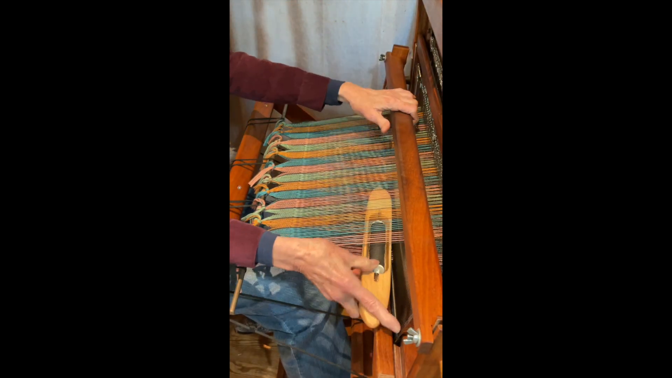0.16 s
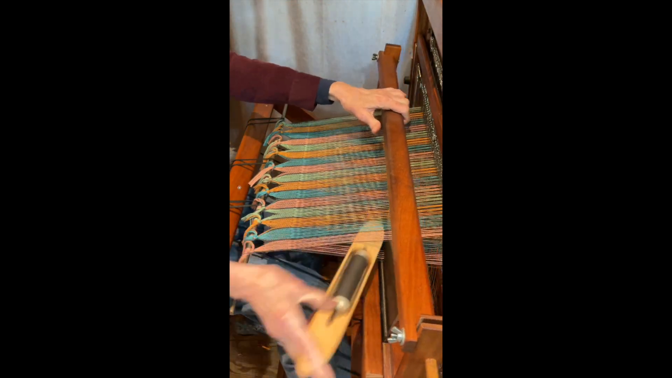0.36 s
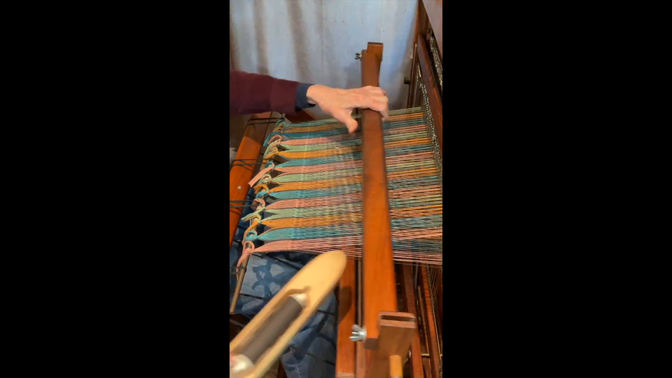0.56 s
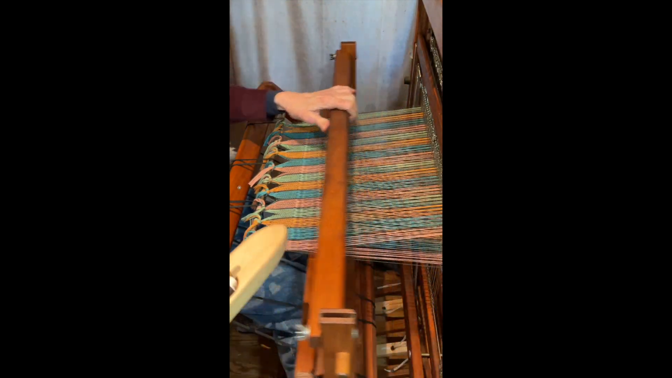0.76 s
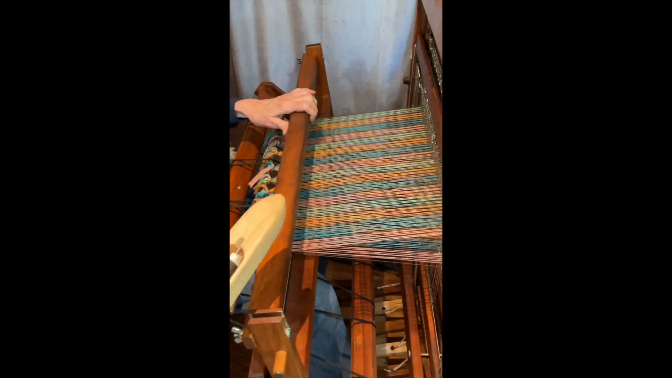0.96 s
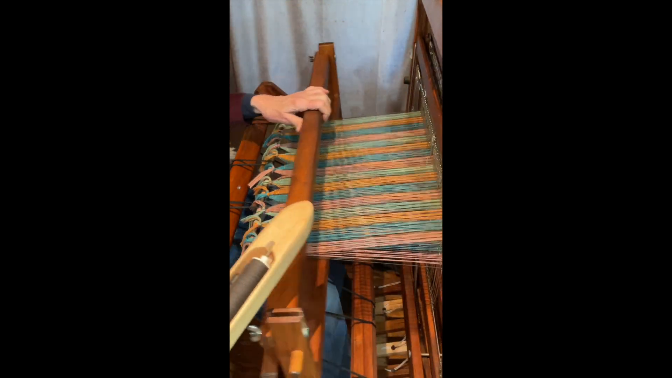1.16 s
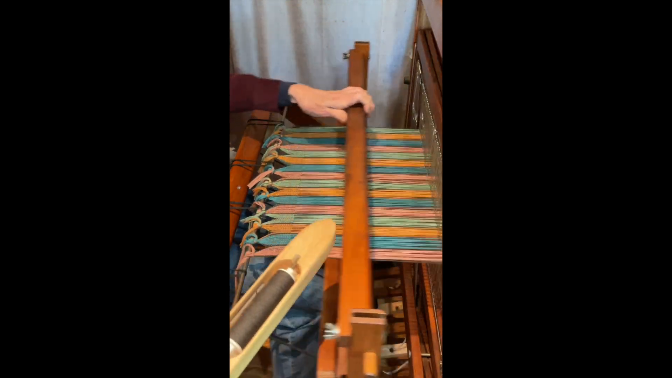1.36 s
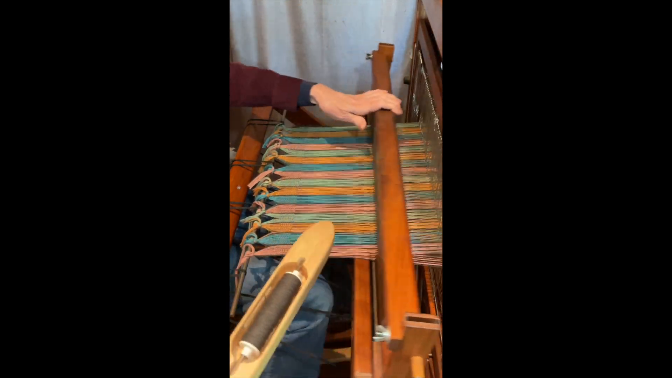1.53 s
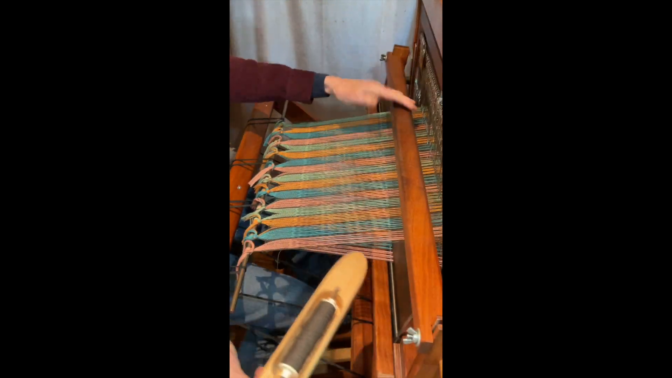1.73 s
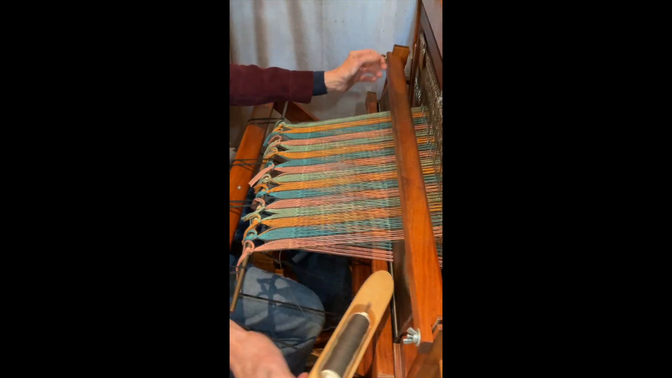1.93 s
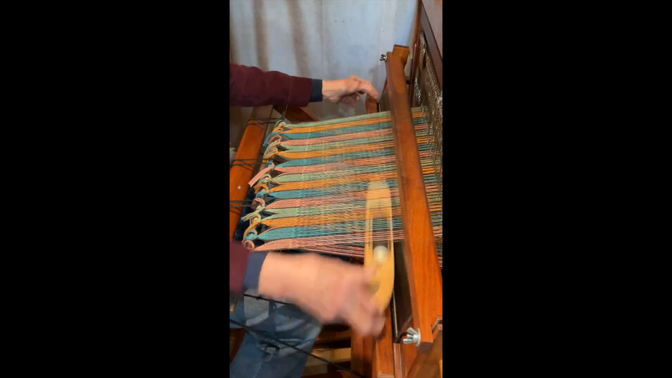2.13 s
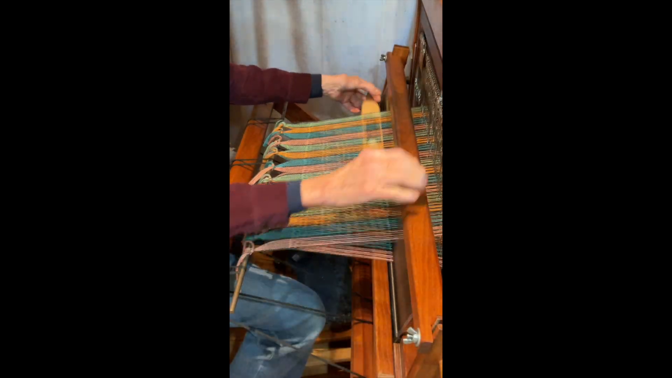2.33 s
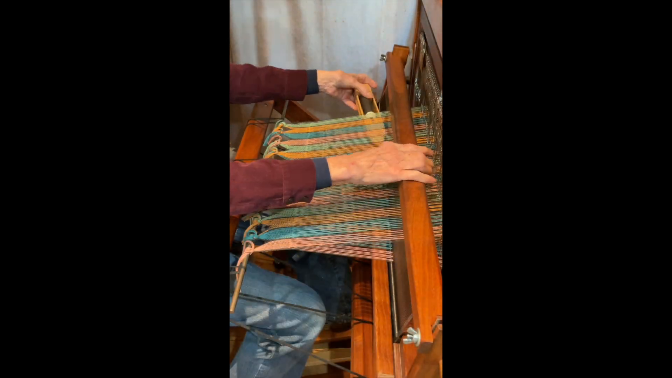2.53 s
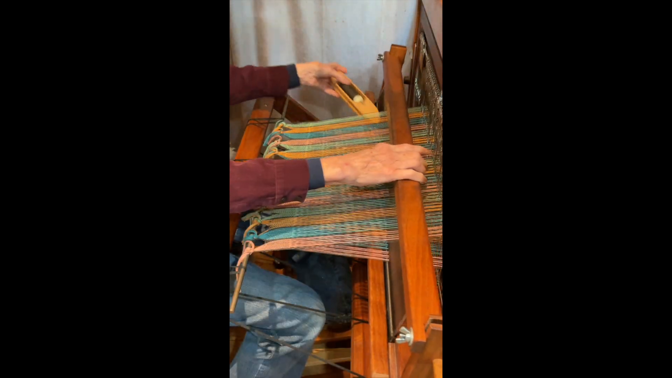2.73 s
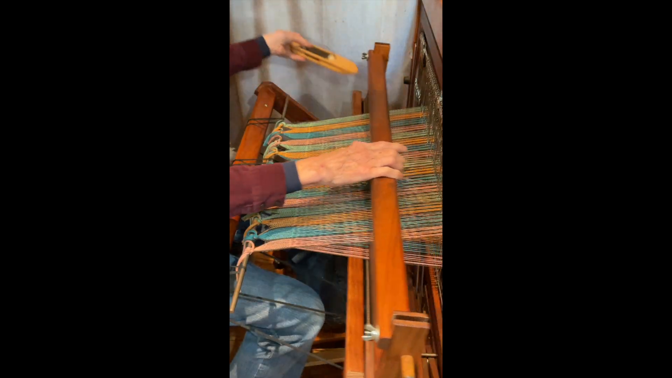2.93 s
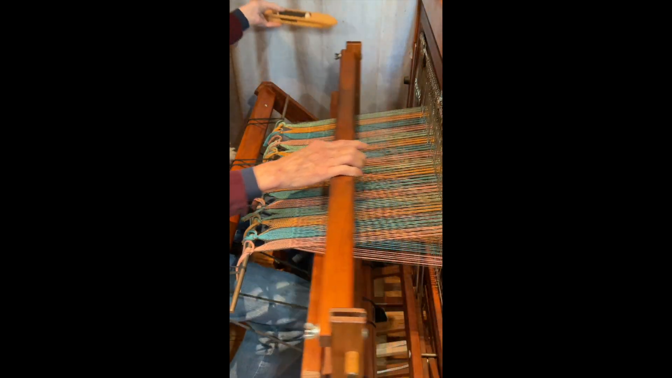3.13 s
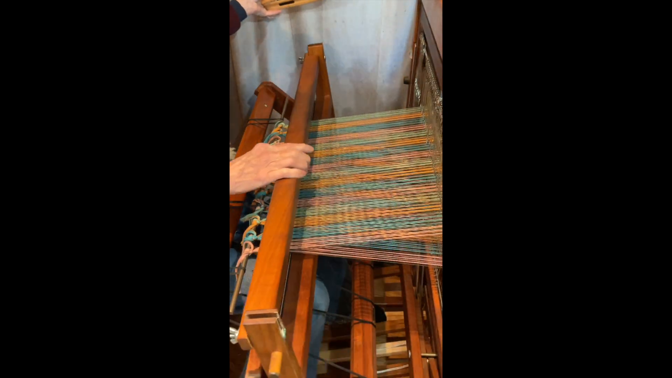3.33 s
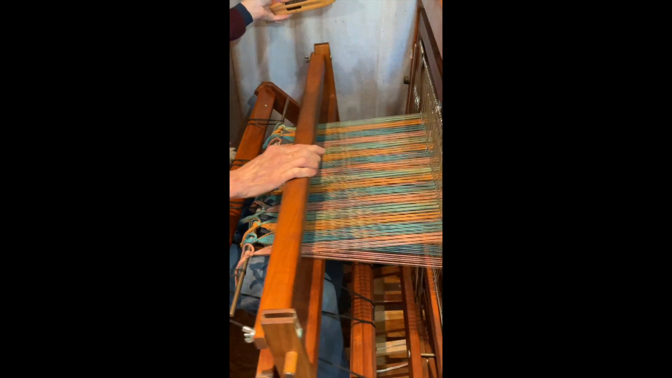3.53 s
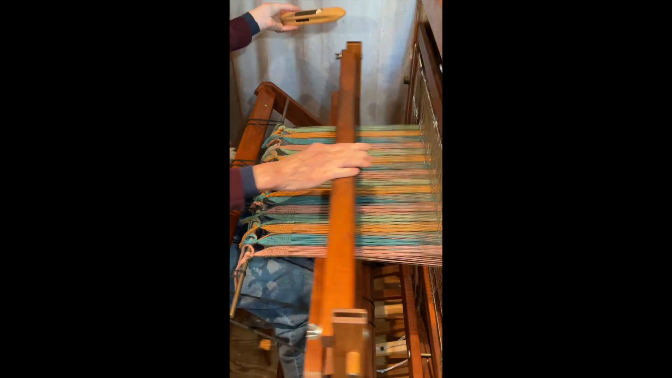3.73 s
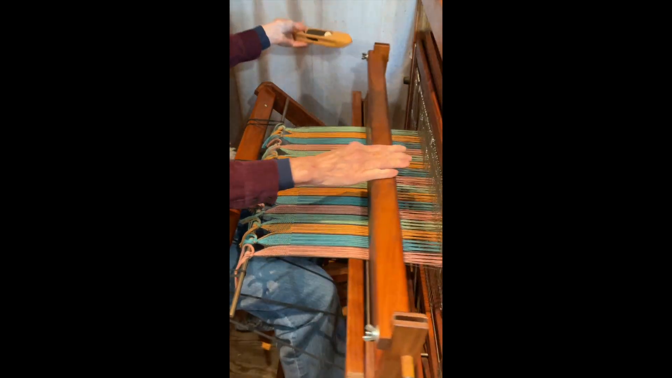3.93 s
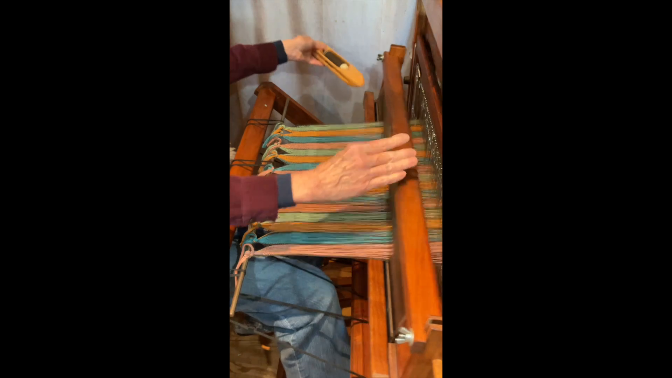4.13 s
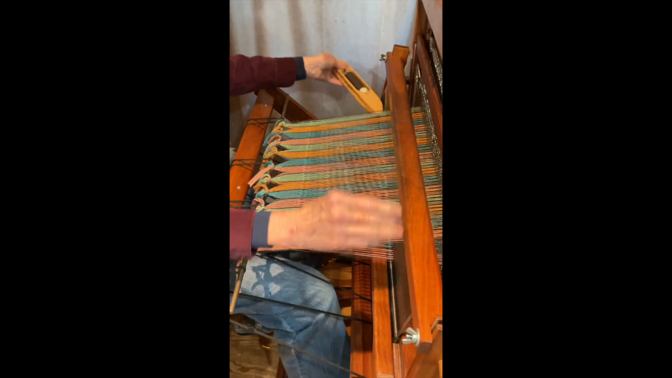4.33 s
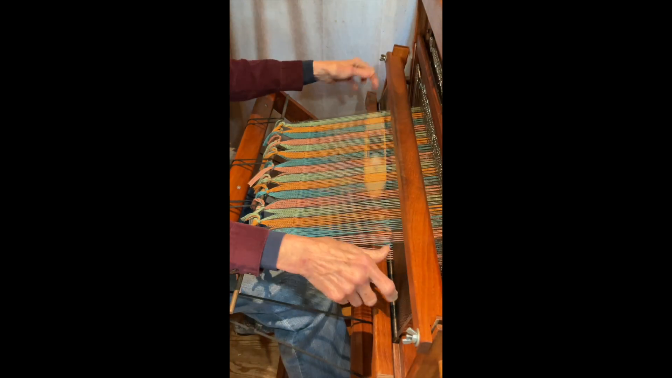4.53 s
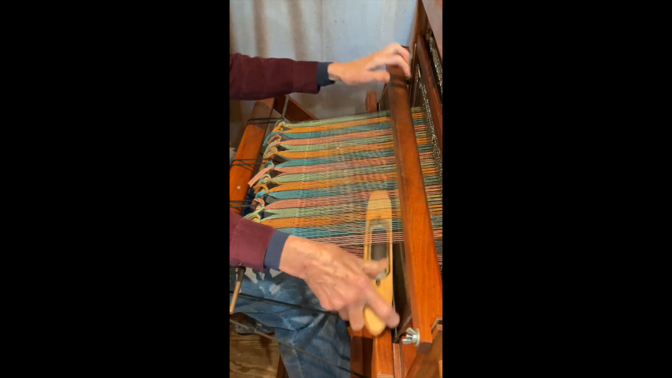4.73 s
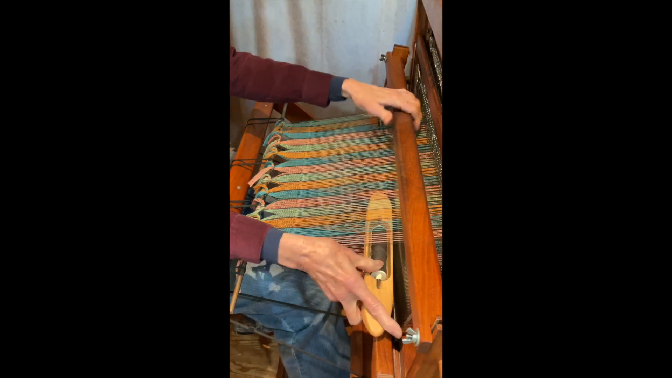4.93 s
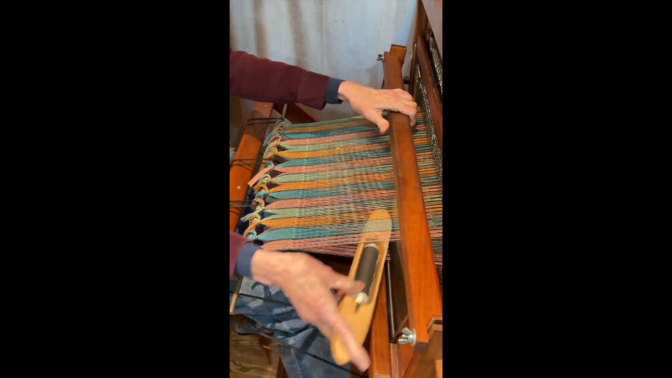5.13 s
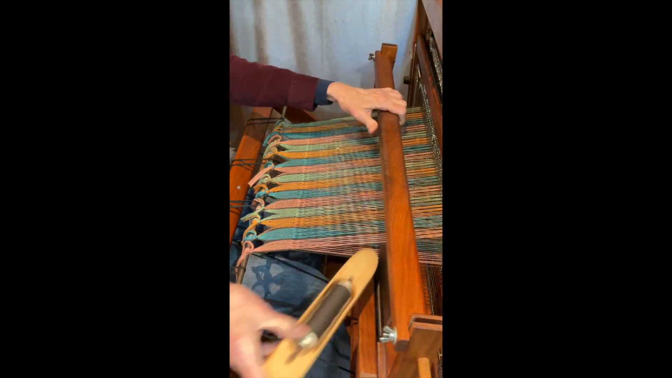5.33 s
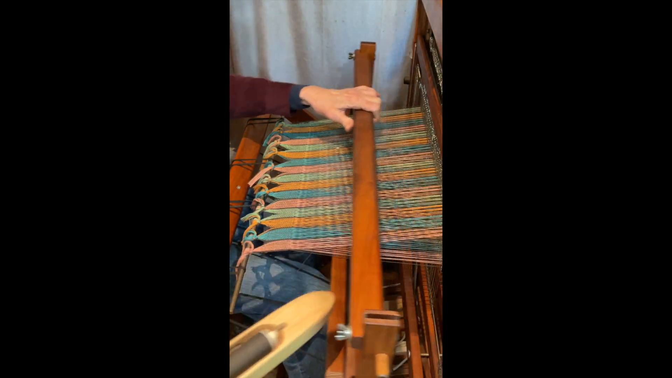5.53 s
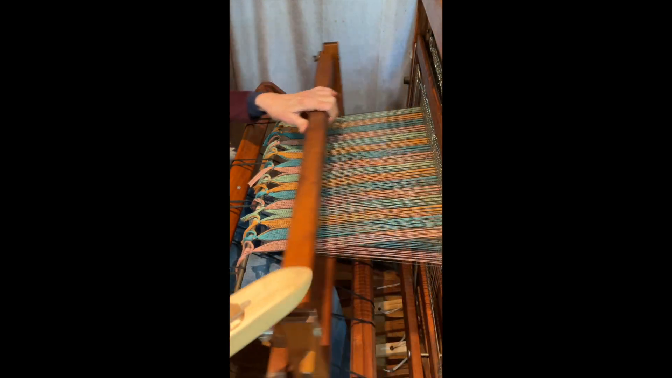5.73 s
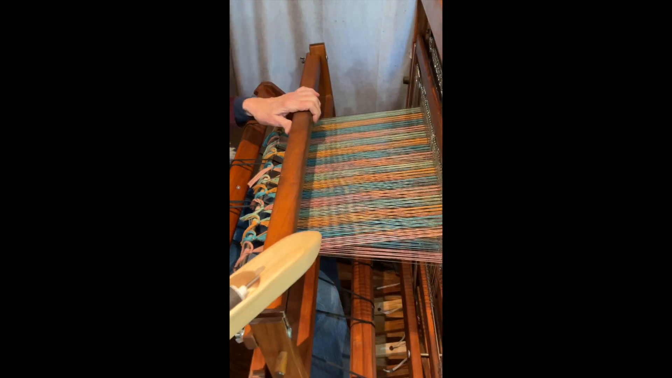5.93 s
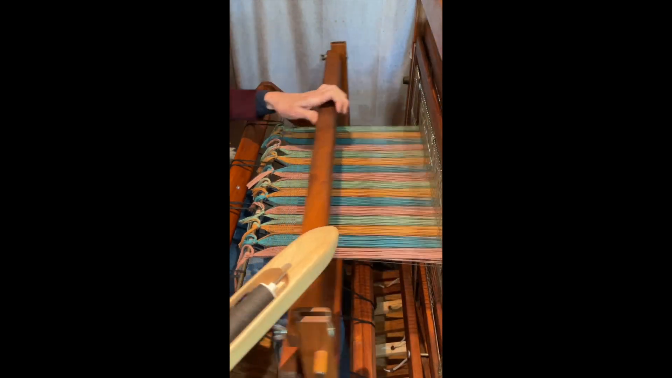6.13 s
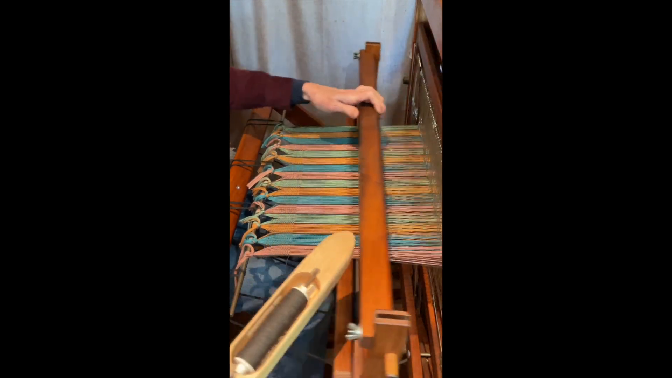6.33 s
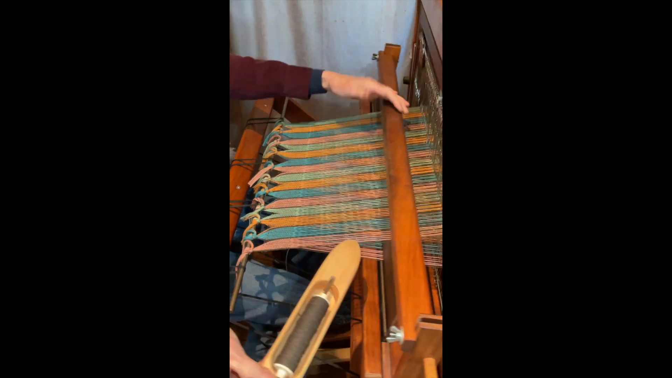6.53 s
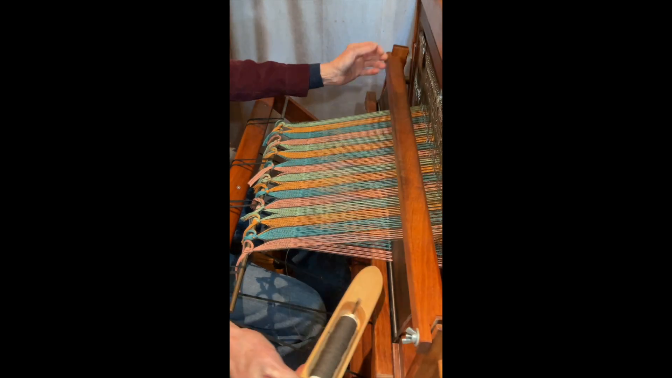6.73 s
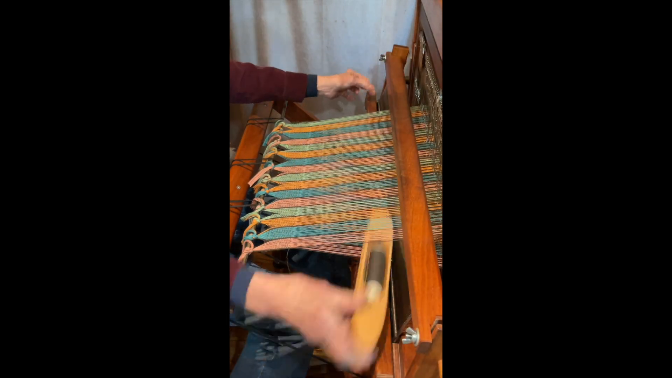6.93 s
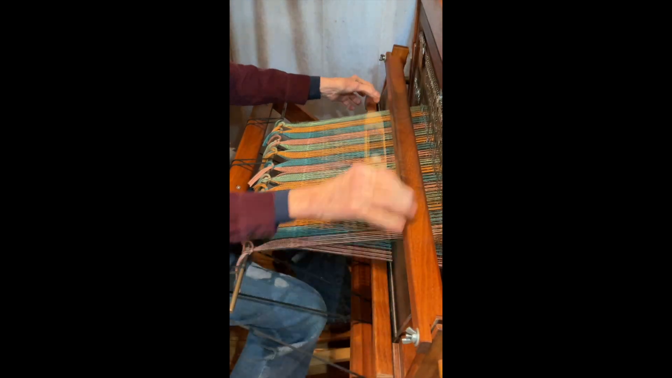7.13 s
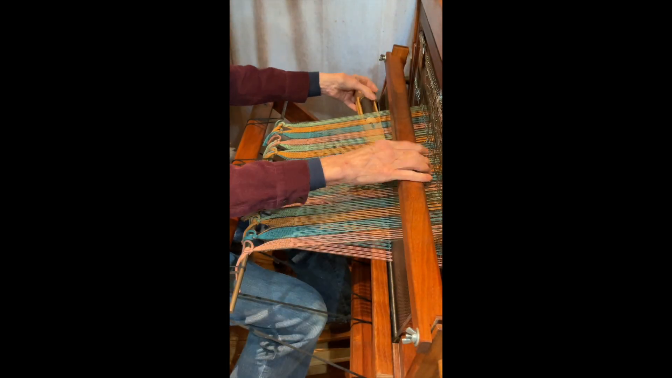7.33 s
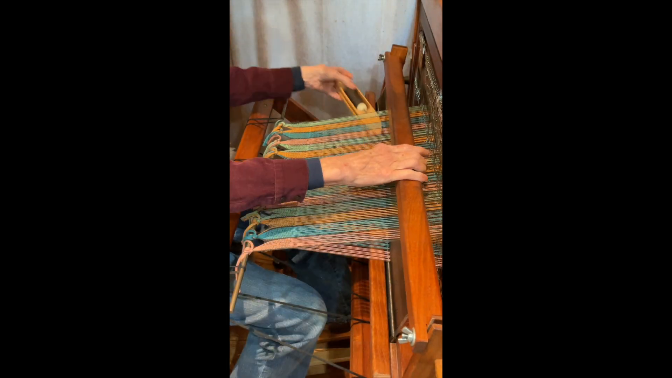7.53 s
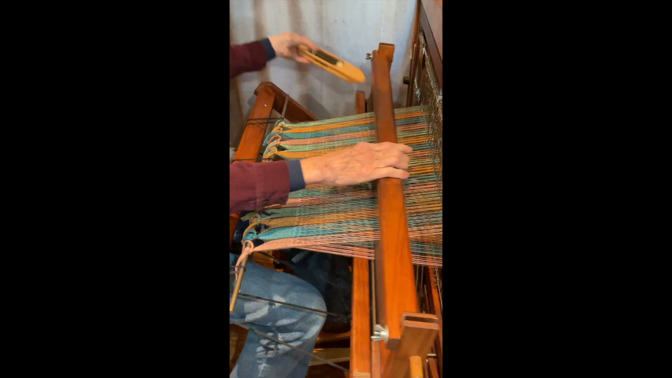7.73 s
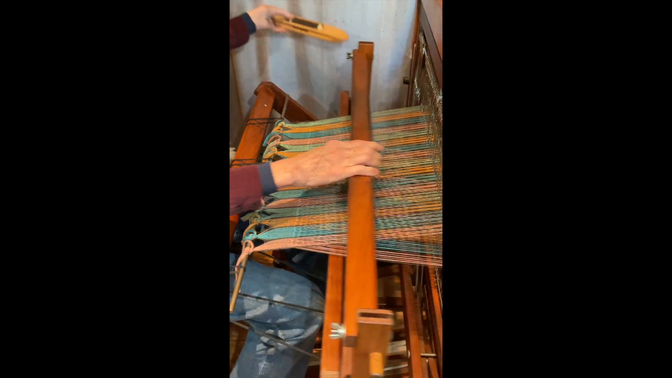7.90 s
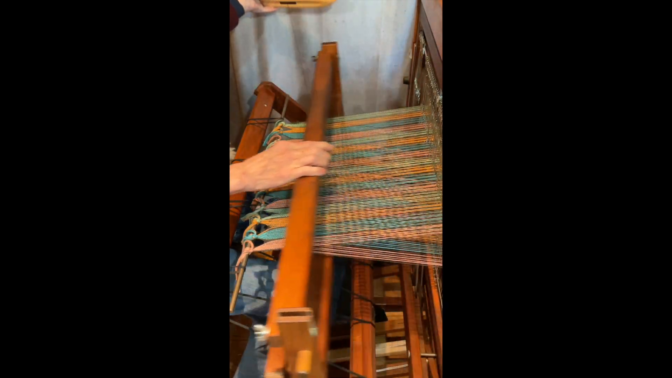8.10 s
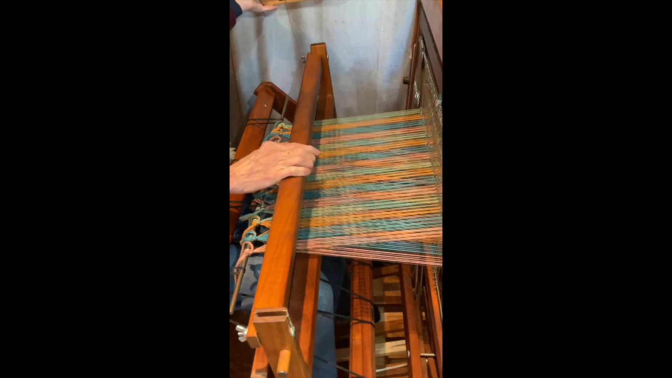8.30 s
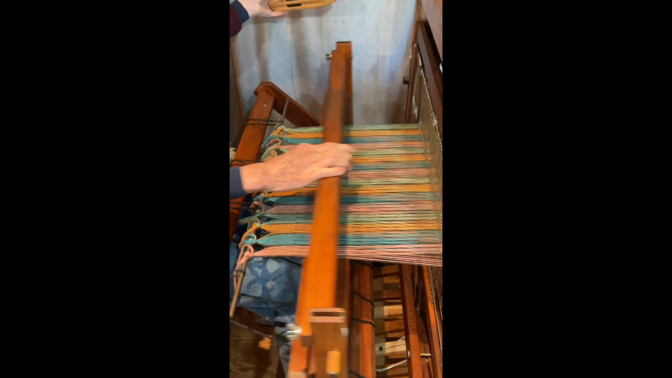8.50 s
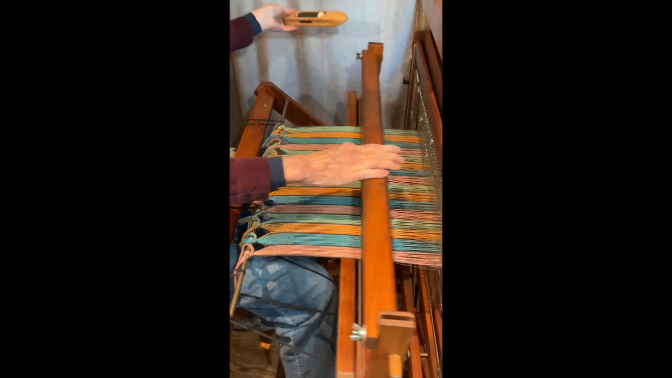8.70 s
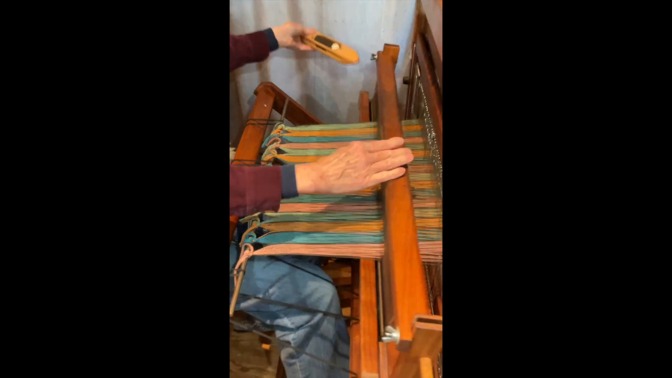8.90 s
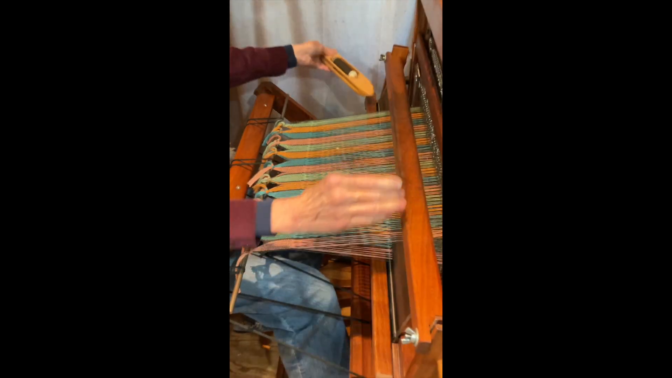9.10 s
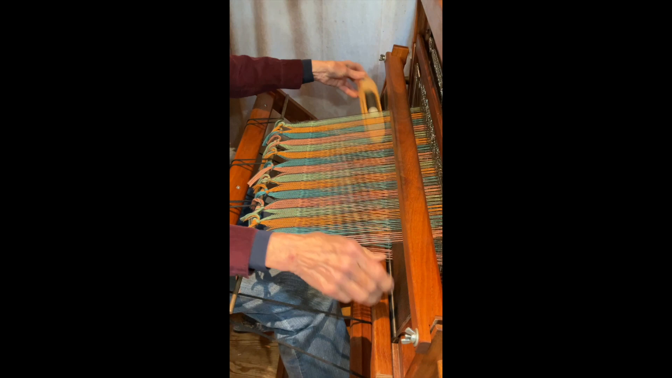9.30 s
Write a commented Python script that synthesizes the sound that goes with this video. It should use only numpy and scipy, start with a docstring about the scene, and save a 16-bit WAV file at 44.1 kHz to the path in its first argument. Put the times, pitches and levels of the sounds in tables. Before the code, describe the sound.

Hand weaving heard close up: a bobbin whirrs and taps, wood knocks, wire heddles jingle, and a shuttle clatters across, four times over.

```python
"""A bobbin whirrs and taps as thread is drawn off it, then a wooden floor loom knocks in a small room.
Four times the weaver presses the thread in with the beater and changes the foot pedals: wood knocks,
the frame rumbles, and the heddles (metal wires that lift the threads) jingle on their bars.
After each round the shuttle glides across the stretched threads, its bobbin spinning and clattering.
The last throw ends with a dry snap of the shuttle's tip."""
import sys
import numpy as np
from scipy import signal
from scipy.fft import rfft, irfft, next_fast_len
from scipy.io import wavfile
from scipy.ndimage import uniform_filter1d

SR = 44100
rng = np.random.default_rng(int(sys.argv[2]) if len(sys.argv) > 2 else 0)


def bounce(signal):
    """Save signal as a 16-bit WAV file at the path given by the first command-line argument."""
    frames = np.transpose(np.atleast_2d(signal))
    limited = np.clip(frames, -1, 1)
    pcm = np.round(limited * 32767).astype(np.int16)
    wavfile.write(sys.argv[1], SR, pcm)


N = 417186
TIME = np.arange(N) / SR
RING_TIME = TIME[:SR // 6]   # time axis for one short sound


def from_db(db):
    """Turn decibels into a gain."""
    return 10 ** (np.asarray(db) / 20)


def rms_one(x):
    """Scale a sound so that its average level (rms) is 1."""
    return x / np.sqrt(np.mean(x ** 2) + 1e-20)


def peak_one(x):
    """Scale a sound so that its loudest two milliseconds have rms 1."""
    return x / np.sqrt(uniform_filter1d(x ** 2, size=SR // 500).max() + 1e-20)


def at_hz(points, hz):
    """Read between the rows of a table, on a log-frequency axis."""
    table = np.array(points)
    return np.interp(np.log(np.maximum(hz, 1)), np.log(table[:, 0]), table[:, 1])


def colour(x, spectrum):
    """Make each frequency as strong as a table says; the result has rms 1."""
    size = next_fast_len(len(x))
    hz = np.arange(size // 2 + 1) * SR / size
    return rms_one(irfft(rfft(x, size) * from_db(at_hz(spectrum, hz)), size)[:len(x)])


def passband(x, hz, kind, order=2):
    """Let the "low" part, the "high" part or one "band" of a sound through."""
    return signal.sosfilt(signal.butter(order, hz, kind, fs=SR, output="sos"), x)


def resonate(x, modes, uneven=False):
    """Ring an object's modes (its natural pitches); if uneven, chance varies their strengths."""
    out = 0
    for k, (hz, width, db) in enumerate(modes):
        r = np.exp(-np.pi * width / SR)
        ring = signal.lfilter([1, 0, -1], [1, -2 * r * np.cos(2 * np.pi * hz / SR), r * r], x + 1e-18)
        weight = 1 + uneven * rng.uniform(-.6, .6)
        out = out + (-1) ** k * (1 - r * r) / 2 * from_db(db) * weight * ring
    return out


def grains(per_s, spread_db, count=N):
    """Tiny contacts of uneven size at random moments."""
    sizes = from_db(spread_db * np.minimum(rng.exponential(1, count), 4)) * rng.choice([-1, 1], count)
    return sizes * (rng.random(count) < per_s / SR)


def wander(hz):
    """A smooth random wobble with rms 1, mostly slower than hz."""
    return rms_one(passband(rng.standard_normal(N), hz, "low"))


def swell(start, rise_s, hold_s, fall_db_per_s):
    """A gain that rises, then fades from hold_s after its start."""
    t = TIME - start
    return np.clip(t / max(rise_s, .001), 0, 1) * from_db(-fall_db_per_s * np.maximum(t - hold_s, 0))


def together(gains):
    """Combine the gains of unrelated motions: their powers add."""
    return np.sqrt(sum(gain ** 2 for gain in gains))


def balance_blow(x, low_db, high_db, middle_db, low_hz=1500, high_hz=6500):
    """Where and how hard a blow lands sets its mix of hollow lows, middle and sharp highs."""
    low = peak_one(passband(passband(x, low_hz, "low"), low_hz, "low"))
    high = peak_one(passband(passband(x, high_hz, "high"), high_hz, "high"))
    middle = peak_one(passband(x, [low_hz, high_hz], "band"))
    return peak_one(from_db(low_db) * low + from_db(middle_db) * middle + from_db(high_db) * high)


def add(out, start_s, sound):
    """Mix a short sound into a track."""
    start = max(round(start_s * SR), 0)
    out[start:start + len(sound)] += sound[:N - start]


# How long the room's echoes take to fade by 60 dB: pitch_hz, fade_s
ECHO_FADE = [(400, 0.44), (2200, 0.41), (5000, 0.27), (16000, 0.16)]
def room_echoes(x, first_echo_s=0.0036):
    """The walls return a blur of echoes whose treble dies first."""
    t, response = TIME[:SR * 3 // 5], 0
    edges_hz = np.geomspace(60, 16000, num=9)
    for low, high in zip(edges_hz, edges_hz[1:]):
        band = passband(rng.standard_normal(len(t)), [low, high], "band")
        response = response + band * from_db(-60 * t / at_hz(ECHO_FADE, np.sqrt(low * high)))
    response = response * (t > first_echo_s)
    return signal.oaconvolve(x, response / np.sqrt(np.sum(response ** 2)))[:N]


# The weaver's movements: start_s, end_s, rumble_db, rustle_db
WEAVER_MOVES = [(0.162, 0.523, -74, -59.5), (2.884, 3.317, -67, -65), (4.995, 5.78, -70.5, -59.5),
                (7.594, 8.17, -70, -64.5)]
def weaver_gains(rise_s=0.01, fall_db_per_s=30):
    """How much rumble and rustle the weaver makes, drawing the shuttle away and shifting on the bench."""
    rumble, rustle = [], []
    for start, end, rumble_db, rustle_db in WEAVER_MOVES:
        move = swell(start, rise_s, end - start, fall_db_per_s)
        rumble.append(from_db(rumble_db) * move)
        rustle.append(from_db(rustle_db) * move)
    return together(rumble), together(rustle)


# Three jolts a round: the shafts (racks of heddles) drop, the next ones rise, the beater swings back.
# start_s, heddle_rise_s, hold_s, heddle_db, rumble_db, rattle_db
LOOM_JOLTS = [(0.926, 0.024, 0.087, -26.5, -48, -45), (1.283, 0.028, 0.12, -29, -41.5, -40.5),
              (1.732, 0.044, 0.038, -28, -37, -40), (3.328, 0.043, 0.058, -26, -45.5, -43.5),
              (3.743, 0.013, 0.16, -27.5, -40, -40.5), (4.172, 0.026, 0.069, -27.5, -41.5, -45.5),
              (5.809, 0.0045, 0.092, -29.5, -48.5, -47.5), (6.115, 0.036, 0.14, -30.5, -43, -42),
              (6.628, 0.007, 0.075, -29, -45, -41), (8.177, 0.015, 0.05, -27, -44, -43),
              (8.543, 0.099, 0.15, -27, -40.5, -44), (9.003, 0.01, 0.049, -26, -40.5, -46)]
# The shuttle and hands bump the beater: start_s, rumble_db, rattle_db
BEATER_BUMPS = [(0.0, -66, -62.5), (2.18, -42.5, -44), (2.4, -53, -50.5), (4.49, -50, -52),
                (4.709, -59, -47), (2.56, -73, -87), (7.027, -45, -48), (7.24, -58, -48.5),
                (9.235, -54, -46.5)]
def frame_gains(bump_hold_s=0.023):
    """How much the jolts and bumps make the frame rumble and rattle."""
    jogs = [(start, hold, deep_db, woody_db) for start, _, hold, _, deep_db, woody_db in LOOM_JOLTS]
    jogs += [(start, bump_hold_s, deep_db, woody_db) for start, deep_db, woody_db in BEATER_BUMPS]
    rumble, rattle = [], []
    for start, hold, deep_db, woody_db in jogs:
        rumble.append(from_db(deep_db) * swell(start, rise_s=0.047, hold_s=hold, fall_db_per_s=58.5))
        rattle.append(from_db(woody_db) * swell(start, rise_s=0.0071, hold_s=hold, fall_db_per_s=64.5))
    return together(rumble), together(rattle)


# Tone of the frame's rumble: pitch_hz, level_db
RUMBLE_TONE = [(20, -62), (42, -10), (62, -3), (94, -5), (110, -3.5), (145, -6.5), (180, -2), (400, -22.5)]
# Deep pitches at which the frame rings: pitch_hz, width_hz, level_db
DEEP_MODES = [(69, 7.6, 0.5), (92.6, 10, 2.5), (145.8, 9.1, 2.5)]
def frame_rumble(ringing_db=-2, rest_db=-80):
    """The heavy frame thuds and rings deeply when it is jogged."""
    jogged, _ = frame_gains()
    shifting, _ = weaver_gains()
    thuds = colour(grains(per_s=600, spread_db=5.5), RUMBLE_TONE)
    ringing = rms_one(resonate(grains(per_s=960, spread_db=1.5), DEEP_MODES))
    return together([jogged, shifting, from_db(rest_db)]) * rms_one(thuds + from_db(ringing_db) * ringing)


# Tone of the woody rattle: pitch_hz, level_db
RATTLE_TONE = [(150, -12.5), (260, 4.5), (440, 8), (1000, -2), (3000, -14.5)]
# Hollow pitches of the loose wooden parts: pitch_hz, width_hz, level_db
HOLLOW_MODES = [(227, 36, 4), (470, 60, 3), (727, 120, -7.5)]
def frame_rattle(hollow_db=-5, rest_db=-85):
    """Loose wooden parts rattle when the frame or the weaver moves."""
    _, jogged = frame_gains()
    _, rustle = weaver_gains()
    hollow = rms_one(resonate(grains(per_s=390, spread_db=1.5), HOLLOW_MODES))
    clatter = colour(grains(per_s=650, spread_db=3.0), RATTLE_TONE) + from_db(hollow_db) * hollow
    return together([jogged, rustle, from_db(rest_db)]) * rms_one(clatter)


# Pitches at which a heddle bar rings: pitch_hz, width_hz, level_db
BAR_MODES = [(6860, 220, -5.5), (9200, 1700, -13), (14500, 700, -20)]
# Squeaks of the bar: start_s, level_db
BAR_SQUEAKS = [(1.537, -30), (6.386, -26)]
def bar_squeaks(swell_s=0.0029):
    """A heddle bar slips briefly in its shaft."""
    out = np.zeros(N)
    for start, db in BAR_SQUEAKS:
        rub = rng.standard_normal(len(RING_TIME)) * RING_TIME * np.exp(-RING_TIME / swell_s)
        add(out, start, from_db(db) * peak_one(resonate(rub, BAR_MODES)))
    return out


def heddle_shake(flutter_db=1.78, flutter_hz=45, linger_db=-17):
    """Each jolt shakes the heddles in uneven bunches; most settle quickly, a few shiver on."""
    shakes = []
    for start, rise, hold, db, _, _ in LOOM_JOLTS:
        settling = swell(start, rise, hold, fall_db_per_s=169)
        lingering = from_db(linger_db) * swell(start, hold, hold, fall_db_per_s=21.5)
        shakes.append(from_db(db) * (settling + lingering))
    return from_db(flutter_db * wander(flutter_hz)) * together(shakes)


# Tone of the metal heddles: pitch_hz, level_db
HEDDLE_TONE = [(500, -7.5), (950, -4), (1900, 1), (3200, 2), (4400, 4), (5400, 3), (6600, -6.5),
               (11300, -6), (16000, -16.5)]
def heddle_jingle(ring_s=0.0089, full_db=-30, dulling=0.028):
    """Groups of thin heddles jostle, each group with its own pitches; gentle touches are duller."""
    jingle, t = 0, RING_TIME[:SR // 16]
    for group in range(8):
        hz = rng.uniform(600, 16500, 160)
        ring = rng.choice([-1, 1], len(hz)) @ np.sin(2 * np.pi * np.outer(hz, t)) * np.exp(-t / ring_s)
        jingle = jingle + signal.oaconvolve(grains(per_s=450, spread_db=2.0), ring)[:N]
    jingle = colour(jingle, HEDDLE_TONE)
    dull = passband(jingle, 5000, "low", order=1)
    shake = heddle_shake()
    hardness = np.minimum(shake / from_db(full_db), 2) ** dulling
    return shake * (dull + hardness * (jingle - dull))


# Crashes of the heddles: start_s, level_db
HEDDLE_CRASHES = [(1.324, -18), (3.834, -24), (6.171, -15.5), (8.631, -24)]
def heddle_crashes(decay_s=0.015):
    """A falling shaft throws a whole row of heddles against its bar in one bright crash."""
    out = np.zeros(N)
    for start, db in HEDDLE_CRASHES:
        touches = colour(grains(per_s=9000, spread_db=3.0, count=len(RING_TIME)), HEDDLE_TONE)
        bright = touches + np.diff(touches, prepend=0)
        add(out, start, from_db(db) * peak_one(bright * np.exp(-RING_TIME / decay_s)))
    return out


# Tone of a blow on the frame: pitch_hz, level_db
KNOCK_TONE = [(120, -11), (300, 5.5), (1200, 21.5), (4400, 20.5), (7000, 3), (16000, -49)]
# Knocks of pedals, shafts and beater: start_s, level_db, low_part_db
LOOM_KNOCKS = [(0.093, -42, 6), (0.928, -18, -28), (1.211, -25.5, -8), (1.264, -21.5, -18),
               (1.294, -22, -13), (1.542, -25.5, -18.5), (1.691, -33.5, -8), (1.73, -19, -20),
               (3.327, -19.5, -41), (3.528, -33, 11), (3.723, -31.5, -7), (3.754, -25, 0),
               (3.879, -17.5, -16), (3.988, -37, -9), (4.06, -33, -1.5), (4.18, -12, -20.5),
               (4.328, -17.5, -15), (5.81, -22, -34.5), (6.058, -24, -8), (6.116, -24, -15),
               (6.531, -38, 3), (6.634, -13.5, -23), (6.814, -18, -24), (7.03, -24, 2), (8.172, -25.5, -26),
               (8.189, -34, -20), (8.232, -19, -32), (8.37, -38.5, 2), (8.545, -23.5, -17),
               (8.686, -20, -9), (8.798, -26, -16.5), (8.98, -33.5, -14), (9.011, -12, -22.5),
               (9.237, -21, -15.5)]
def loom_knocks(decay_s=0.0046, low_linger=0.78, early_s=0.0055, rebound_s=0.008):
    """A blow rings the jointed frame at many pitches at once; the low ones last longest."""
    out, t = np.zeros(N), RING_TIME[:SR // 12]
    for start, db, low_db in LOOM_KNOCKS:
        hz = 130 + 15500 * np.linspace(0, 1, num=170) ** 2 * rng.uniform(.96, 1.04, 170)
        strength = from_db(at_hz(KNOCK_TONE, hz)) * rng.standard_normal(len(hz))
        life_s = decay_s * (2000 / hz) ** low_linger
        wood = strength @ (np.sin(2 * np.pi * np.outer(hz, t)) * np.exp(-np.outer(1 / life_s, t)))
        blow = from_db(db) * balance_blow(wood, low_db, high_db=-24, middle_db=-13)
        # Loose joints touch just before the blow and rebound just after it.
        add(out, start - early_s, from_db(-21.5) * blow)
        add(out, start, blow)
        add(out, start + rebound_s * rng.uniform(.5, 1.5), from_db(-7) * blow)
    return out


# Tone of rubbed yarn: pitch_hz, level_db
YARN_TONE = [(1200, -3), (2800, 5.5), (6500, -3.5), (8000, 0.5), (16000, -12)]
# The shuttle slides over the threads: start_s, end_s, level_db
SHUTTLE_GLIDES = [(2.02, 2.13, -40), (4.447, 4.696, -43), (6.88, 6.97, -40), (9.272, 9.42, -43)]
def yarn_rubbing(threads_hz=1500, slowing_per_s=0.9, fast_db=-44, sleeve_db=5, rest_db=-76):
    """The shuttle zips over thread after thread, slowing as it goes; sleeves add a softer hiss."""
    glides, speed = [], np.ones(N)
    for start, end, db in SHUTTLE_GLIDES:
        glides.append(from_db(db) * swell(start, rise_s=0.035, hold_s=end - start, fall_db_per_s=202))
        speed = np.where(TIME > start, np.exp(-slowing_per_s * np.maximum(TIME - start, 0)), speed)
    gliding = together(glides)
    # Each throw wavers slowly, and uneven thread spacing roughens the tone.
    speed = speed * (1 + 0.05 * wander(hz=6) + 0.024 * wander(hz=300))
    threads_passed = np.floor(np.cumsum(threads_hz * speed) / SR)
    zip_tone = np.diff(threads_passed, prepend=0) * np.sqrt(SR / threads_hz)
    zip_share = 1.6 * np.minimum(gliding / from_db(fast_db), 1) ** 2
    hiss = rms_one(grains(per_s=5100, spread_db=3.5))
    friction = (hiss + zip_share * zip_tone) / np.sqrt(1 + zip_share ** 2)
    _, rustle = weaver_gains()
    level = together([gliding, from_db(sleeve_db) * rustle, from_db(rest_db)])
    return level * colour(passband(friction, 900, "high"), YARN_TONE)


# The bobbin spins during each throw and as the thread is drawn tight (a negative fade grows louder):
# start_s, end_s, whirr_db, hiss_db, fade_db_per_s
BOBBIN_SPINS = [(0.0, 0.038, -56, -49.5, 3), (0.258, 0.838, -42.5, -63, 21),
                (1.975, 2.531, -45.5, -71, -10), (2.847, 3.32, -49, -46, 21.5), (4.4, 4.795, -56, -69, -13),
                (5.02, 5.077, -47.5, -69, 0), (5.118, 5.293, -47.5, -50.5, 7), (5.275, 5.724, -45, -63, 8),
                (6.885, 7.37, -48, -52, -7), (7.657, 8.18, -40, -45, 32.5), (9.253, 9.46, -43, -61, 24)]
def spin_gains(rise_s=0.015, stop_db_per_s=122):
    """How loud the whirr and thread hiss are: each spin starts quickly, fades or grows, then stops."""
    whirr, hiss = [], []
    for start, end, whirr_db, hiss_db, fade_db_per_s in BOBBIN_SPINS:
        fade = from_db(-fade_db_per_s * np.clip(TIME - start, 0, end - start))
        turning = swell(start, rise_s, end - start, stop_db_per_s) * fade
        whirr.append(from_db(whirr_db) * turning)
        hiss.append(from_db(hiss_db) * turning)
    return together(whirr), together(hiss)


# Pitches at which the bobbin rings: pitch_hz, width_hz, level_db
BOBBIN_MODES = [(1227, 80, -1), (2200, 150, 6), (2940, 320, -9), (4700, 690, -6), (8100, 430, -18)]
# Tone of the unwinding thread: pitch_hz, level_db
THREAD_TONE = [(1200, -26), (2800, 8), (4500, 7), (6500, 2), (7800, 4), (10000, -3), (16000, -12)]
def bobbin_spin(rub_db=-24, wobble_db=3, wobble_hz=30, tug_db=2.6, tug_hz=14):
    """The bobbin wobbles and rubs on its spindle while thread hisses off it in uneven tugs."""
    contacts = grains(per_s=760, spread_db=1.0) * from_db(wobble_db * wander(wobble_hz))
    rub = from_db(rub_db) * passband(contacts, [1100, 5500], "band")
    whirr = rms_one(resonate(contacts, BOBBIN_MODES) + rub)
    hiss = colour(passband(grains(per_s=5000, spread_db=3.0), 900, "high"), THREAD_TONE)
    tugs = from_db(tug_db * wander(tug_hz))
    whirr_gain, hiss_gain = spin_gains()
    return whirr_gain * whirr + hiss_gain * tugs * hiss


# Chirps of the bobbin: start_s, level_db, pitch_hz
BOBBIN_CHIRPS = [(0.002, -42.5, 3940), (5.116, -39, 2700), (5.145, -35.5, 2760), (6.899, -29, 2860)]
def bobbin_chirps(swell_s=0.007):
    """As thread is pulled, the bobbin sticks and slips on its spindle and rings at one pitch."""
    out = np.zeros(N)
    for start, db, hz in BOBBIN_CHIRPS:
        rub = rng.standard_normal(len(RING_TIME)) * RING_TIME * np.exp(-RING_TIME / swell_s)
        add(out, start, from_db(db) * peak_one(resonate(rub, [(hz, hz / 20, 0)])))
    return out


# Soft taps of the bobbin, while thread is drawn off and as light first touches just before some clacks of the
# thrown shuttle: start_s, level_db, low_part_db
BOBBIN_TAPS = [(0.291, -19, -4), (0.321, -28.5, -17), (0.428, -31, -13), (0.452, -34, -27),
               (0.502, -33.5, -24), (0.584, -26.5, -24), (0.593, -41, -12), (0.746, -27, -14),
               (2.038, -25, -14), (2.162, -23, 11), (2.907, -32, 0), (2.998, -32.5, -26), (4.495, -34, 6),
               (4.713, -27, 2), (5.322, -27, 3), (5.342, -34, -12), (5.354, -32, -8), (5.366, -25, -27),
               (5.46, -31.5, -8), (5.491, -31, -10), (5.507, -27, -10), (5.608, -26.5, -21),
               (5.642, -21.5, 0.5), (5.69, -32, -5), (7.701, -20, -11.5)]
def bobbin_taps(chatter_s=0.0075, crack_db=-20):
    """The bobbin chatters lightly against the shuttle wall and rings."""
    out = np.zeros(N)
    for start, db, low_db in BOBBIN_TAPS:
        force = rng.standard_normal(len(RING_TIME)) * np.exp(-RING_TIME / chatter_s)
        crack = from_db(crack_db) * passband(force, [1000, 5500], "band")
        wood = resonate(force, BOBBIN_MODES, uneven=True) + crack
        add(out, start, from_db(db) * balance_blow(wood, low_db, high_db=-45, middle_db=-2))
    return out


# Pitches at which shuttle and bobbin ring together: pitch_hz, width_hz, level_db
SHUTTLE_MODES = [(1166, 82, -0.5), (1550, 630, -3), (2167, 94, 11), (2260, 250, 5.5), (2780, 310, 1.5),
                 (3384, 94, 4.5), (4195, 150, -1), (4620, 113, 2.5), (5130, 224, -1.5), (8180, 320, -9),
                 (8450, 200, -6.5)]
def clack(low_db, high_db, chatter_s, crack_db=-12, bite_db=8, bite_hz=3200):
    """One chattering hit of bobbin on spindle and shuttle wall; harder hits are brighter."""
    pressure = np.exp(-RING_TIME / chatter_s) * (1 + RING_TIME / 0.0058)
    force = rng.standard_normal(len(RING_TIME)) * pressure
    force[0] += 7.1   # the sharp first touch
    modes = np.array(SHUTTLE_MODES, float)
    modes[:, 0] *= rng.uniform(.975, 1.025, len(modes))   # hand and yarn shift the pitches a little
    wood = resonate(force, modes, uneven=True) + from_db(crack_db) * passband(force, [600, 7500], "band")
    bite = from_db(bite_db + high_db / 2) * passband(wood, bite_hz, "high", order=1)
    return balance_blow(wood + bite, low_db, high_db, middle_db=0.5)


# Ticks of the thread: start_s, level_db
THREAD_TICKS = [(0.323, -21.5), (0.37, -29), (0.387, -27.5), (3.107, -30.5), (5.017, -38.5), (5.248, -37),
                (7.595, -34), (7.733, -19.5)]
def thread_ticks():
    """The thread snaps free of its winding with a bright tick."""
    out = np.zeros(N)
    for start, db in THREAD_TICKS:
        add(out, start, from_db(db) * clack(low_db=-16, high_db=-6, chatter_s=0.0018))
    return out


# Clacks of the thrown shuttle: start_s, level_db, low_part_db, high_part_db, chatter_s
SHUTTLE_CLACKS = [(1.962, -13, 2, -38, 0.0041), (1.983, -19.5, -7, -5, 0.0042),
                  (2.168, -18.5, -2, -7, 0.0062), (2.183, -23.5, -21, -0.5, 0.0052),
                  (2.231, -25.5, -2, -4, 0.0058), (2.259, -22, -11, -5, 0.0047),
                  (2.31, -19.5, -9.5, -12.5, 0.0085), (2.324, -24, -13, -11, 0.0043),
                  (2.357, -23, -8, -1.5, 0.0092), (2.403, -17.5, 3, 3.5, 0.0081),
                  (2.448, -24, -5, -27, 0.0064), (2.492, -21.5, 6, 0, 0.0048),
                  (2.526, -27, -13, -11, 0.0029), (4.411, -19, -2, -47, 0.0022),
                  (4.442, -29, 1.5, -3.5, 0.0089), (4.501, -24.5, 1, -8, 0.0064),
                  (4.664, -29.5, -11, -1.5, 0.012), (4.723, -18, -2, -9, 0.0037),
                  (4.757, -27, -9, -2, 0.0067), (6.864, -20, -2.5, -10, 0.0047),
                  (7.028, -16, -2, -10, 0.0085), (7.071, -18.5, -28, -9, 0.006),
                  (7.232, -23, -7, -12, 0.0066), (7.249, -18, -1, -8, 0.0077),
                  (7.319, -18, -1, -14, 0.0021), (7.327, -18, -32, -4, 0.003),
                  (7.387, -24.5, -32, -11, 0.0045), (9.421, -31.5, -22, -3, 0.0044)]
def shuttle_clacks():
    """The thrown shuttle hits its bobbin, the hand and the reed (the comb in the beater)."""
    out = np.zeros(N)
    for start, db, low_db, high_db, chatter_s in SHUTTLE_CLACKS:
        add(out, start, from_db(db) * clack(low_db, high_db, chatter_s))
    return out


# Pitches at which the shuttle's tip rings: pitch_hz, width_hz, level_db
TIP_MODES = [(1410, 660, -2), (2280, 110, 8), (2690, 110, 5.5), (3170, 94, 9), (4000, 240, 8),
             (4560, 150, -9), (7200, 610, -16)]
def tip_snap(start_s=9.368, level_db=-12.5, chatter_s=0.0041):
    """The shuttle's hard tip strikes the reed with one short, dry snap."""
    out = np.zeros(N)
    force = rng.standard_normal(len(RING_TIME)) * np.exp(-RING_TIME / chatter_s)
    add(out, start_s, from_db(level_db) * peak_one(resonate(force, TIP_MODES)))
    return out


def scene(shuttle_echo_db=-12, loom_echo_db=-9, metal_echo_db=-18):
    """Loom and shuttle close by, with the room's echoes behind them."""
    shuttle = shuttle_clacks() + bobbin_taps() + thread_ticks() + tip_snap() + bobbin_chirps()
    loom = loom_knocks() + bar_squeaks()
    metal = heddle_jingle() + heddle_crashes()
    echoes = room_echoes(from_db(shuttle_echo_db) * shuttle + from_db(loom_echo_db) * loom
                         + from_db(metal_echo_db) * metal)
    frame = frame_rumble() + frame_rattle()
    running = bobbin_spin() + yarn_rubbing()
    return (echoes + frame + metal + loom + running + shuttle)[None]


def record(dry, low_hz=44, top_hz=16000):
    """The microphone drops the lowest bass and the highest treble."""
    thinned = passband(passband(dry, low_hz, "high"), low_hz, "high")
    return signal.sosfilt(signal.ellip(10, .1, 80, top_hz, fs=SR, output="sos"), thinned)


dry = scene()
out = record(dry)
bounce(out)
```